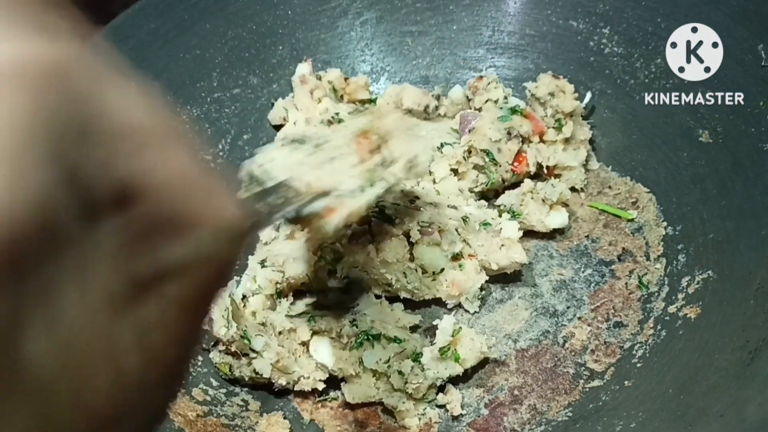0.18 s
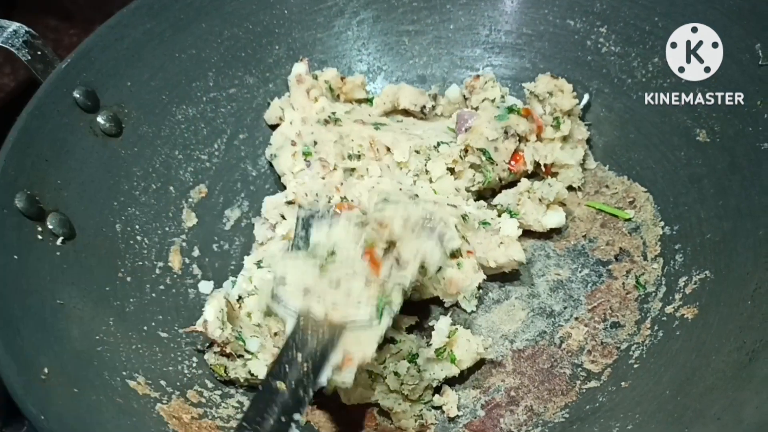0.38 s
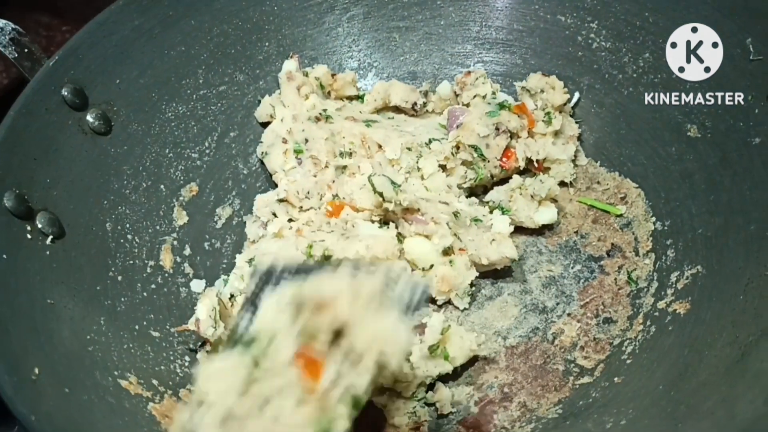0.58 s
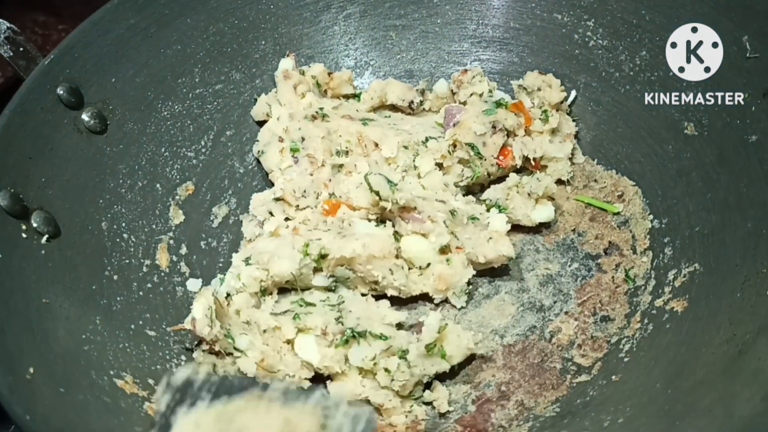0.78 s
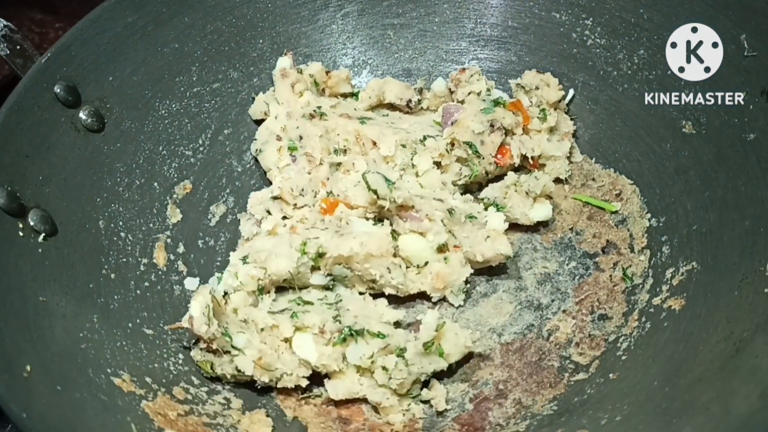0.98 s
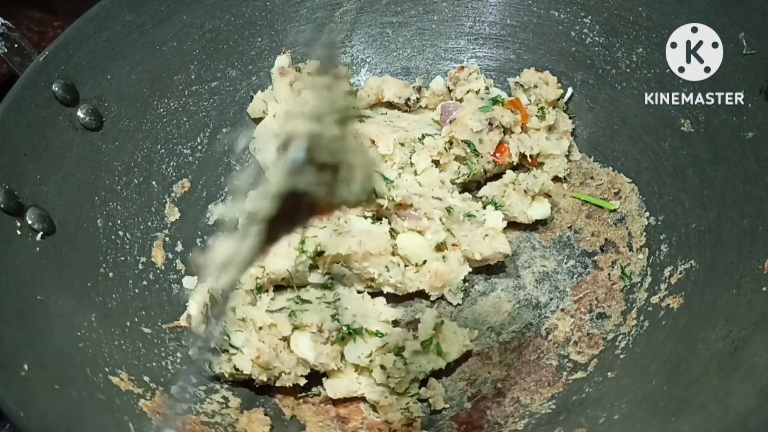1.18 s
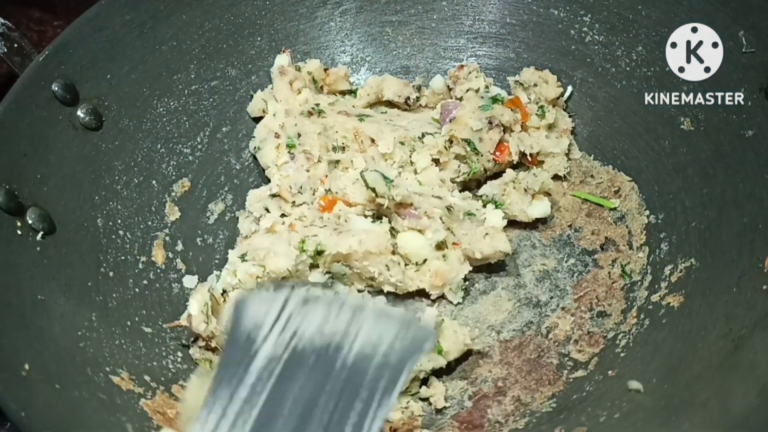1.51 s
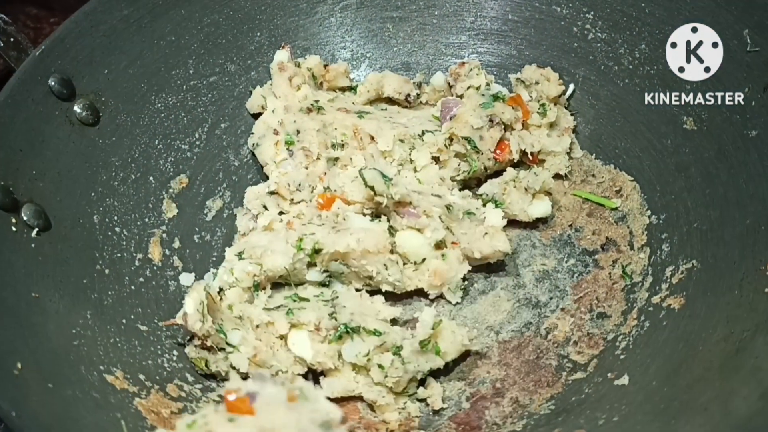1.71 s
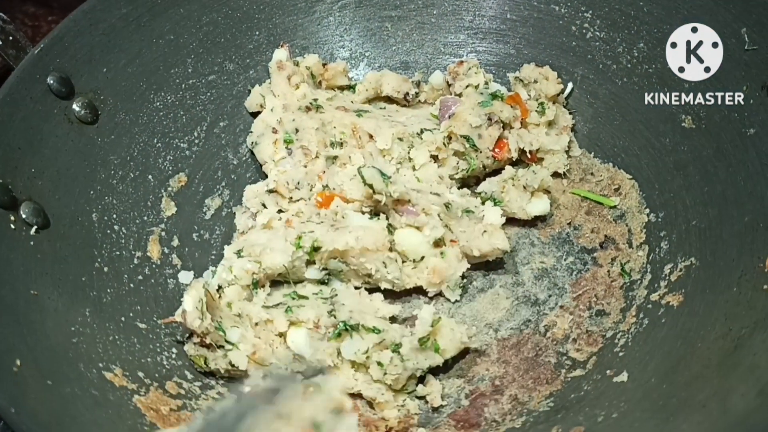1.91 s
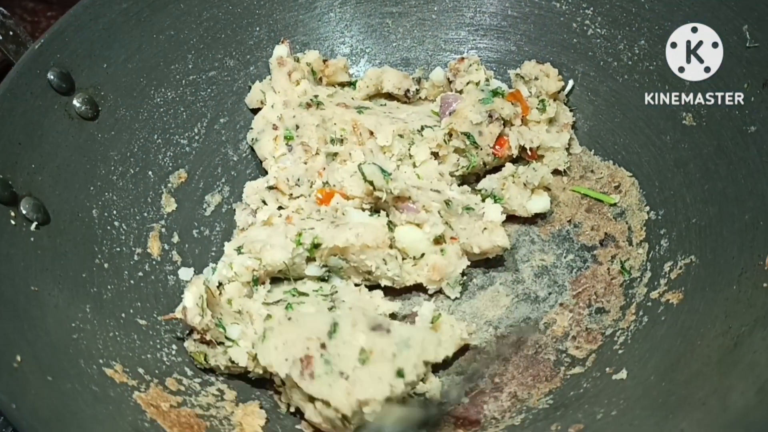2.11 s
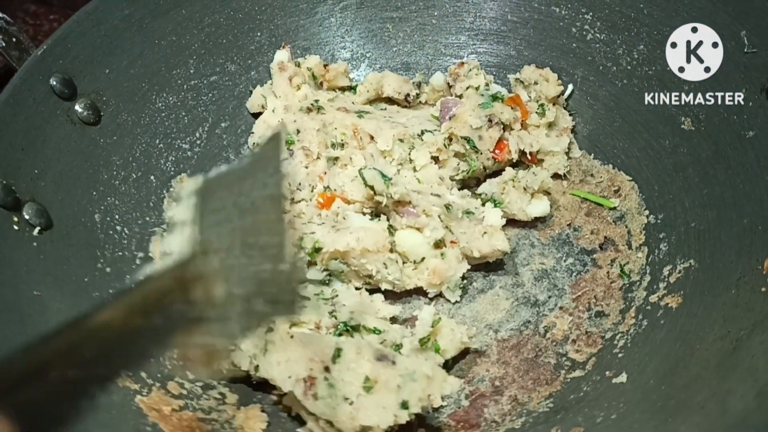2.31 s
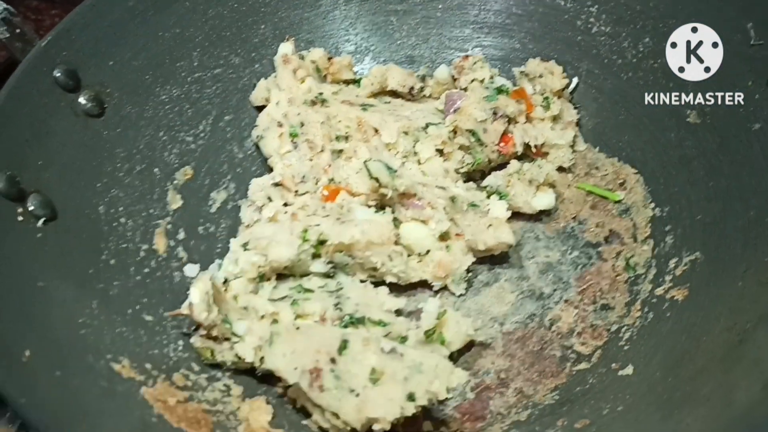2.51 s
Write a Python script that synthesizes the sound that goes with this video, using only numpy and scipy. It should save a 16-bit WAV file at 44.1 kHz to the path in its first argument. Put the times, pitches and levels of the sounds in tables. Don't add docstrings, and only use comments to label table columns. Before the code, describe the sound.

A metal spatula works mashed food in a steel pan, close up: light ticks, a soft thud and scrape, then hard ringing bangs, another scrape and a final pair of clangs over a low kitchen hum.

```python
import sys
import numpy as np
from scipy import signal
from scipy.fft import rfft, irfft
from scipy.io import wavfile
from scipy.ndimage import uniform_filter1d

SR = 44100
rng = np.random.default_rng(int(sys.argv[2]) if len(sys.argv) > 2 else 0)


def digitize_waveform(pressure):
    field = np.atleast_2d(pressure).T
    bounded = np.clip(field, -1, 1)
    quanta = np.round(bounded * 32767).astype(np.int16)
    wavfile.write(sys.argv[1], SR, quanta)


def ratio(d):
    e = np.asarray(d, float) / 20
    return 10 ** e


N = 116865

# start_s, level_db
HUM_LEVEL = [(0, -36), (.2, -34.5), (.5, -35), (.85, -33), (1.2, -33), (1.43, -33), (1.7, -36.5),
             (2.17, -34), (2.4, -31.5), (2.445, -36.5), (2.49, -33.5), (2.65, -34.5)]
# pitch_hz, width_hz, level_db
DRONES = [(65, 14, -52), (98.5, 37, -59.5), (180.3, 24.6, -46.5), (310, 15, -53.5), (442, 108, -52.5),
          (1085, 38.4, -52.5)]
# frequency_hz, level_db (per Hz)
AIR_SPECTRUM = [(25, -45), (60, -8), (110, -1.5), (240, -11), (500, -9), (680, -18), (3500, -26),
                (16000, -56)]
# pitch_hz, width_hz, level_db
HISS_HUMPS = [(7450, 3200, -50), (14650, 4800, -50.5)]
# start_s, peak_db, pitch_hz, t60_s
EDGE_TICKS = [(0.1163, -25, 6470, 0.041), (0.1534, -9, 7260, 0.034), (0.1642, -13, 6670, 0.049),
              (0.1818, -21, 8100, 0.021), (0.2196, -21, 6380, 0.093), (0.239, -27, 6770, 0.04),
              (0.2942, -20.5, 7260, 0.088), (0.302, -22, 5660, 0.14), (0.3212, -18.5, 6800, 0.056),
              (0.3355, -19.5, 8560, 0.053), (0.4414, -20, 8400, 0.048), (0.459, -20.5, 8250, 0.058),
              (0.5357, -22.5, 5350, 0.049), (0.568, -23, 4350, 0.067), (0.573, -15, 8740, 0.033),
              (0.5834, -16.5, 8330, 0.03), (0.6326, -24.5, 6150, 0.06), (0.7622, -23, 6100, 0.067),
              (1.0813, -9, 7500, 0.065), (1.3844, -12, 6460, 0.075), (1.4415, -10.5, 7200, 0.012),
              (1.9634, -23, 7800, 0.03), (2.0045, -15, 6550, 0.052), (2.022, -28.5, 7800, 0.12)]
# pitch_hz, level_db
EDGE_RESONANCES = [(2700, -15), (4200, -15), (5300, -6.5), (6500, -3.5), (7300, -4.5), (8500, 0),
                   (9800, -8.5), (11300, -6), (13000, -5.5), (14700, -4)]
# start_s, level_db, pitch_hz, t60_s
TIP_PINGS = [(0.537, -31.5, 1265, 0.059), (0.55, -32, 2570, 0.049), (.592, -30, 2760, 0.033),
             (0.63, -24.5, 6120, 0.018), (.647, -45, 2980, 0.023), (1.043, -33, 2730, 0.025),
             (1.054, -22, 5000, 0.05), (1.074, -18.5, 5850, 0.086), (1.081, -15, 7700, 0.032),
             (1.11, -30.5, 2180, 0.082), (1.158, -32, 7230, 0.026), (1.497, -28, 14450, 0.21),
             (1.612, -32, 5730, 0.035), (1.625, -32.5, 7740, .18), (1.846, -36.5, 5140, 0.061),
             (1.883, -38, 7700, 0.028), (1.913, -36, 4670, .06), (1.926, -31, 2750, 0.033),
             (1.96, -36, 7720, 0.062), (1.964, -26, 5830, .04), (2.004, -31, 5500, 0.045),
             (2.012, -39, 3850, 0.059), (2.025, -38.5, 3800, 0.078), (2.021, -32, 5540, 0.064),
             (2.026, -35, 7400, 0.055)]
# start_s, peak_db, pitch_hz, t60_s
FOOD_THUDS = [
    (.14, -23.5, 1310, 0.014),
    (0.537, -17.5, 1245, 0.15),
    (.567, -17, 1600, 0.04),
    (0.592, -15.5, 890, 0.075),
    (1.042, -9.5, 405, 0.06),
    (1.928, -12, 490, 0.045),
    (1.94, -22, 400, 0.15),
    (1.497, -18.5, 460, 0.14),
    (2.341, -25.5, 900, 0.12),
]
# frequency_hz, level_db (per Hz)
MASH_SPECTRUM = [(120, -1), (300, -0.5), (700, -3.5), (1400, -3.5), (1870, -16.5), (2700, -9), (3200, -21),
                 (4500, -31.5)]
# start_s, level_db
DRAG_PRESSURE = [(.52, -95), (.58, -40), (.7, -46), (.77, -45.5), (1.04, -49.5), (1.055, -31),
                 (1.085, -22.5), (1.13, -41.5), (1.2, -51), (1.3, -53), (1.55, -41), (1.67, -35.5),
                 (1.75, -44), (1.84, -48), (1.85, -45), (1.97, -35), (2.0, -46), (2.08, -55)]
# frequency_hz, level_db (per Hz)
GRIT_SPECTRUM = [(880, -47), (1500, -9), (2940, -6.5), (3220, -18.5), (5120, -1), (7460, -2),
                 (10900, -10.5), (15100, -6.5), (16000, -12)]
# pitch_hz, width_hz, level_db
SINGING_TONES = [(4800, 80, -7), (5130, 45, -7), (5320, 50, -2), (5810, 70, -6), (7200, 200, -6),
                 (7690, 50, 0)]
# start_s, pitch_hz, level_db, t60_s
CLEAR_TONES = [(.538, 1280, -20, 0.045), (1.467, 880, -21.5, 0.11), (1.478, 880, -17.5, 0.088),
               (1.5, 912, -20.5, 0.085), (1.464, 2169, -19, 0.061), (1.477, 2169, -18, 0.098),
               (1.49, 2169, -21, 0.062), (1.49, 2886, -22, 0.11), (1.692, 2886, -27, 0.11),
               (1.384, 6500, -24, 0.038), (2.22, 2169, -13, 0.065), (2.233, 2169, -31, 0.14),
               (2.22, 880, -32, 0.1), (2.233, 2886, -24, 0.26), (2.316, 2169, -8, .04),
               (2.328, 2169, -29.5, 0.17), (2.328, 2886, -19.5, 0.23), (2.335, 1389, -32, 0.12)]
# start_s, peak_db, pan_ring_db, blade_ring_db, chatter_t60_s
BLADE_BANGS = [(1.4639, -4.5, -33, 0.5, 0.13), (1.476, -6, -20, 2.5, 0.041), (1.484, -6.5, -18, 2.5, 0.072),
               (1.506, -17.5, -17, -1, .04), (1.677, -16, -10, 6, 0.027), (1.683, -12, -17, -4.5, 0.055),
               (2.217, 0.5, -12, -3, 0.046), (2.226, -4.5, -20, -2, 0.051), (2.233, -14, -7, -17, 0.018),
               (2.317, -8.5, -29, 1, 0.1), (2.325, -11.5, -2, 2, 0.031)]
# frequency_hz, level_db (per Hz)
CRASH_SPECTRUM = [(200, -9.5), (900, -14.5), (1700, -7.5), (3200, -13), (4700, -7), (7600, -4),
                  (10500, -12), (15500, -10)]
# frequency_hz, t60_s
SHIMMER_DECAY = [(1000, 0.15), (5000, 0.1), (9000, 0.049), (15000, 0.049)]
# pitch_hz, level_db, t60_s
PAN_MODES = [(851, -12, .15), (1389, -12, .14), (3558, -17, .15), (4480, -11, .16), (5127, -10, .12),
             (5480, -12, .16), (6374, -12, .14), (6977, -13, .12), (7892, -15, .12)]
# pitch_hz, level_db, t60_s
BLADE_MODES = [(865, -9, .05), (912, -10, .06), (2120, -14, .025), (2780, -9, .03), (3490, -10, .06),
               (4750, -2, .05), (5175, -6, .05), (5308, -3, .06), (5850, -3, .05), (6520, -6, .05),
               (7000, -3, .05), (7230, -2, .05), (7690, 0, .055)]
# frequency_hz, t60_s
ROOM_DECAY = [(300, 0.41), (2000, 0.43), (6000, 0.25), (15000, 0.25)]
# start_s, level_db
CAMERA_GAIN = [(1.435, 1.5), (1.46, -3.5), (1.5, -3.5), (1.57, 0.5), (1.66, 1.5), (1.72, 2.5), (2.18, 3),
               (2.192, -13), (2.34, -8.5), (2.38, -4.5), (2.49, 1)]
TOP_HZ = 15550


def evened(x):
    return x / np.sqrt(np.mean(x ** 2) + 1e-20)


def read(points, hz):
    f, value = np.transpose(points)
    return np.interp(np.log(hz + 1), np.log(f + 1), value)


def curve(points):
    return np.interp(np.arange(N) / SR, *np.transpose(points))


def add(mix, s, sound):
    part = mix[round(s * SR):][:len(sound)]
    part += sound[:len(part)]


def true_gain(s, db):
    return ratio(db - np.interp(s, *np.transpose(CAMERA_GAIN)))


def smoothed_noise(shape, size):
    return uniform_filter1d(uniform_filter1d(rng.standard_normal(shape), size=size), size=size)


def colour(x, points):
    hz = abs(np.fft.fftfreq(4096, 1 / SR))
    log = np.log(ratio(np.maximum(read(points, hz), -100)))
    taps = np.fft.ifft(np.exp(np.conj(signal.hilbert(log)))).real[:2048]
    return signal.oaconvolve(x, taps / np.linalg.norm(taps))[:len(x)]


def resonate(x, hz, width):
    r = np.exp(-np.pi * width / SR)
    return 2 * signal.lfilter([1 - r], [1, -r * np.exp(2j * np.pi * hz / SR)], x).real


def resonate_twice(x, hz, width):
    return resonate(resonate(x, hz, width), hz, width)


def burst(t60, grain_db):
    t = np.arange(SR // 2) / SR
    grains = np.minimum(rng.exponential(1, len(t) // 60 + 1), 2)
    size = ratio(grain_db * grains).repeat(60)[:len(t)]
    rattle = evened(size * rng.standard_normal(len(t)))
    return rattle * ratio(-60 * t / t60) * np.minimum(t / 0.00012, 1)


def ring(modes, t60, spread_db):
    hz, db, life = np.transpose(modes)[:, :, None]
    life = np.clip(life, .01, .5)
    t = np.arange(int(SR * life.max())) / SR
    luck = rng.random((2, len(hz), 1))
    kick = burst(t60, 1.0)[:SR // 10]
    kick = kick / np.linalg.norm(kick)
    fed = np.interp(hz, np.fft.rfftfreq(len(kick), 1 / SR), abs(rfft(kick)))
    level = ratio(db + spread_db * (luck[0] - 1.5) - 60 * t / life) / np.maximum(fed, .5)
    free = level * np.sin(2 * np.pi * (hz * t + luck[1]))
    return np.pad(signal.fftconvolve(free.sum(0), kick), (0, SR))[:SR // 2]


def crowd(points, lo_hz, count):
    hz = rng.uniform(lo_hz, TOP_HZ, count)
    db = read(points, hz)
    db_each = db - 10 * np.log10(np.sum(ratio(2 * db)))
    return np.transpose([hz, db_each, read(SHIMMER_DECAY, hz)])


def kitchen():
    waver = evened(smoothed_noise(N, 3000))
    phase = 2 * np.pi * 99.9 * np.arange(N) / SR + 0.49 * waver
    sound = np.sqrt(2) * ratio(curve(HUM_LEVEL)) * np.cos(phase)
    for hz, width, db in [*DRONES, *HISS_HUMPS]:
        sound += ratio(db) * evened(resonate_twice(rng.standard_normal(N), hz, width))
    air_gain = ratio(read(AIR_SPECTRUM, np.fft.rfftfreq(N, 1 / SR)))
    air = irfft(rfft(rng.standard_normal(N)) * air_gain, N)
    return sound + ratio(-44) * evened(air)


def ticks():
    out = np.zeros(N)
    rise = np.minimum(np.arange(8000) / SR / .0007, 1)
    for s, db, hz, t60 in EDGE_TICKS:
        rattle = burst(t60, 0.52)[:8000] * rise
        sound = ratio(5) * resonate_twice(rattle, hz, 440)
        for hump_hz, hump_db in EDGE_RESONANCES:
            level_luck, pitch_luck = rng.random(2) - .5
            hump = resonate_twice(rattle, hump_hz * (1 + 0.11 * pitch_luck), 1000)
            sound += ratio(hump_db + 5 * level_luck) * hump
        add(out, s, true_gain(s, db) * sound)
    return out


def thuds():
    out = np.zeros(N)
    for s, db, hz, t60 in FOOD_THUDS:
        modes = [(hz, 0, 0.5 * t60), (240, -6, t60), (360, -2, t60), (460, -4, t60),
                 (860, -6, 1.1 * t60), (1330, -9, 0.35 * t60), (2160, -17, .025), (2740, -14, .02)]
        slap = ratio(-6.5) * colour(burst(t60, 0.74), MASH_SPECTRUM)
        add(out, s, true_gain(s, db - 5) * (slap + ring(modes, 0.029, 4.7)))
    return out


def drag():
    clicks = rng.random(N) < 5000 / SR
    click_size = ratio(3.4 * np.minimum(rng.exponential(1, N), 2))
    grit = rng.standard_normal(N) * (0.11 + click_size * clicks)
    slow = smoothed_noise((len(SINGING_TONES) + 1, N), 500)
    slow = slow / slow.std()
    grit = evened(grit * ratio(1.1 * slow[0]))
    sing = np.zeros(N)
    for (hz, width, db), patch in zip(SINGING_TONES, slow[1:]):
        sing += ratio(db + 4 * patch) * evened(resonate(grit, hz, width))
    scrape = colour(grit, GRIT_SPECTRUM) + ratio(-2.5) * evened(sing)
    return ratio(curve(DRAG_PRESSURE) - curve(CAMERA_GAIN)) * scrape


def pings():
    out = np.zeros(N)
    for s, db, hz, t60 in TIP_PINGS:
        pair = [(hz, 0, t60), (1.012 * hz, -5, t60)]
        add(out, s, true_gain(s, db) * ring(pair, 0.0089, 0.88))
    return out


def chimes():
    t, age = np.arange(N) / SR, np.arange(SR // 2) / SR
    out = np.zeros(N)
    table = np.array(CLEAR_TONES)
    tones = np.round(np.log(table[:, 1]) * 8)
    for tone in np.unique(tones):
        power, rows = np.zeros(N), table[tones == tone]
        for s, hz, db, t60 in rows:
            swell = ratio(-60 * age / t60) * np.minimum(age / .005, 1)
            add(power, s, (true_gain(s, db) * swell) ** 2)
        out += np.sqrt(power) * np.sin(2 * np.pi * (rows[-1, 1] * t + rng.random()))
    return out


def bangs():
    out = np.zeros(N)
    for s, db, pan_db, blade_db, t60 in BLADE_BANGS:
        sound = ratio(-3) * colour(burst(t60, 2.0), CRASH_SPECTRUM)
        sound += ratio(1) * ring(crowd(CRASH_SPECTRUM, 596, count=70), 0.03, 18.5)
        sound += ratio(pan_db) * ring(PAN_MODES, 0.011, 5.8)
        sound += ratio(blade_db) * ring(BLADE_MODES, 0.016, 4.8)
        add(out, s, true_gain(s, db - 7.5) * sound)
    return out


def room(x):
    taps = np.zeros(SR // 2)
    at = np.arange(200, SR // 2 - 20, 20)
    taps[at + rng.integers(0, 20, len(at))] = rng.choice([-1., 1.], len(at))
    hz, t, z = signal.stft(taps, SR, nperseg=256)
    decay = ratio(-60 * t / read(ROOM_DECAY, hz)[:, None])
    tail = signal.istft(z * decay, SR, nperseg=256)[1]
    return signal.fftconvolve(x, tail / np.linalg.norm(tail))[:N]


def scene():
    low_cut = signal.butter(2, 150, "high", fs=SR, output="sos")
    near = signal.sosfilt(low_cut, ticks() + thuds() + drag() + pings() + bangs())
    return (near + ratio(-10) * room(near) + kitchen() + chimes())[None]


def roll_off(x):
    return signal.sosfilt(signal.butter(12, 16810, fs=SR, output="sos"), x)


def record(dry):
    x = np.tanh(dry * ratio(curve(CAMERA_GAIN)))
    top = irfft(rfft(x) * (np.fft.rfftfreq(N, 1 / SR) > TOP_HZ), N)
    power_now, power_around = uniform_filter1d(top ** 2, size=512), uniform_filter1d(top ** 2, size=4096)
    sharp = power_now > ratio(9) * power_around
    gate = uniform_filter1d(1. * sharp, size=256)
    return roll_off(x - top + ratio(-33) * top * gate)


dry = scene()
out = record(dry)
digitize_waveform(out)
```